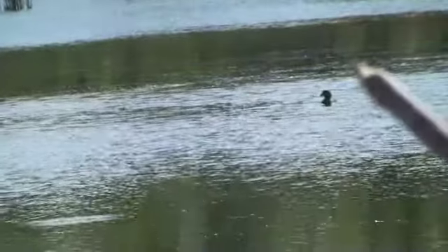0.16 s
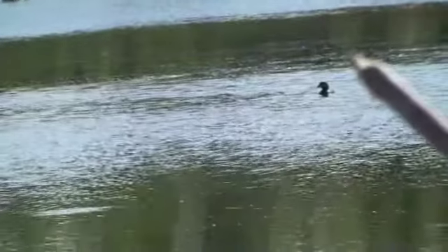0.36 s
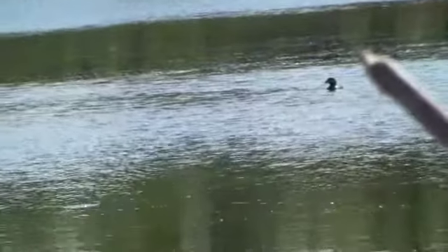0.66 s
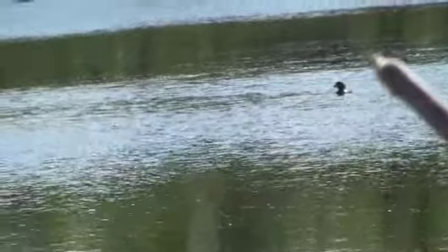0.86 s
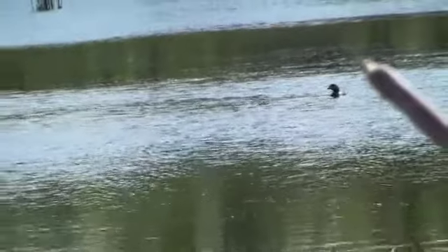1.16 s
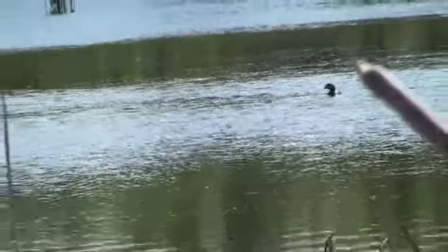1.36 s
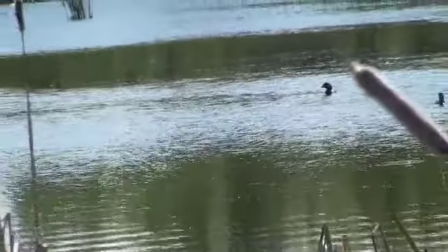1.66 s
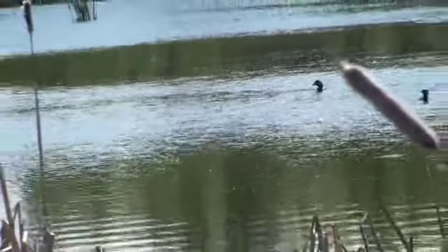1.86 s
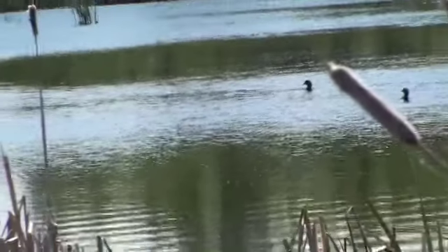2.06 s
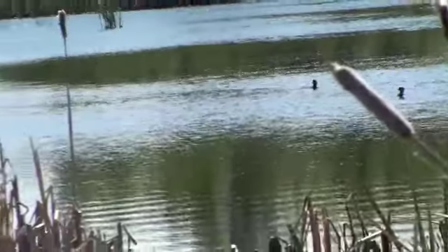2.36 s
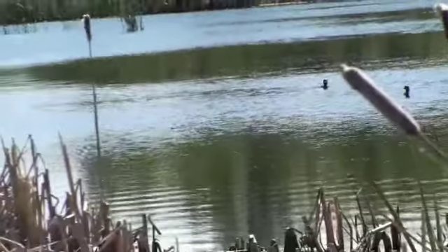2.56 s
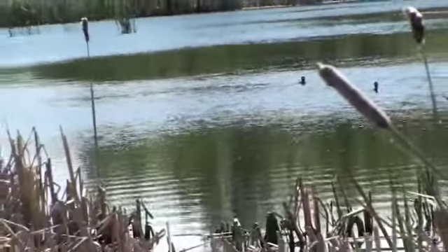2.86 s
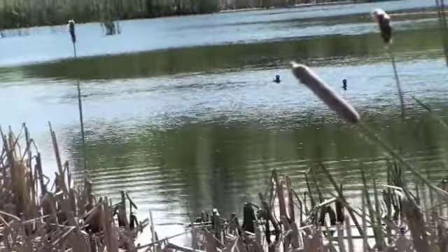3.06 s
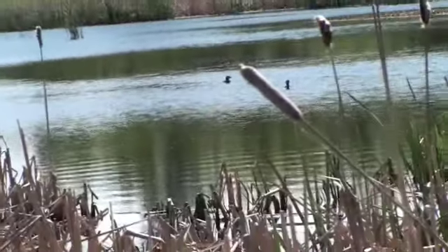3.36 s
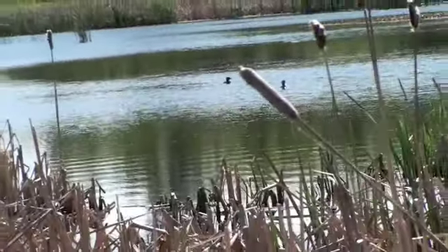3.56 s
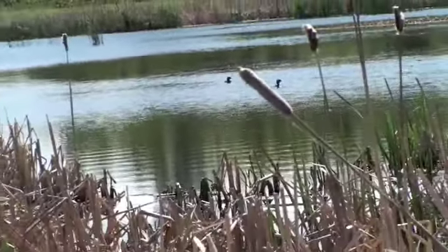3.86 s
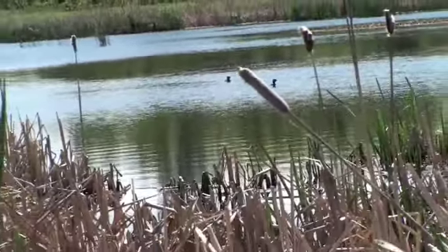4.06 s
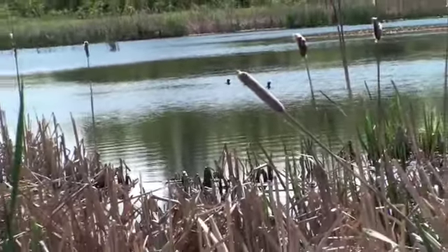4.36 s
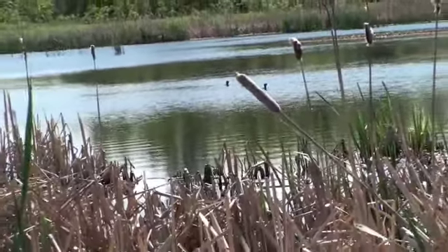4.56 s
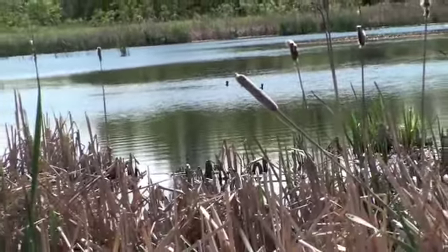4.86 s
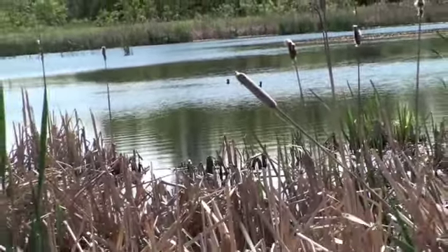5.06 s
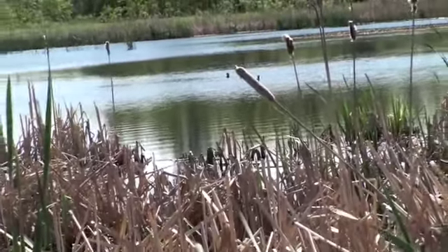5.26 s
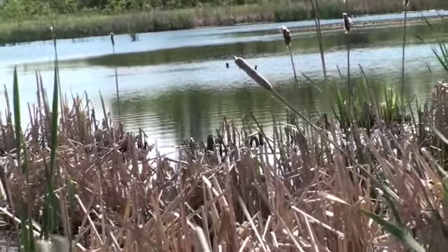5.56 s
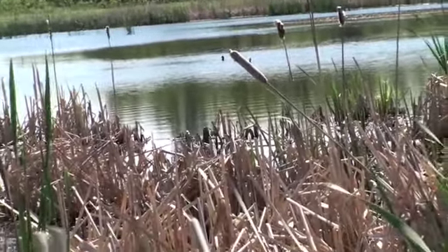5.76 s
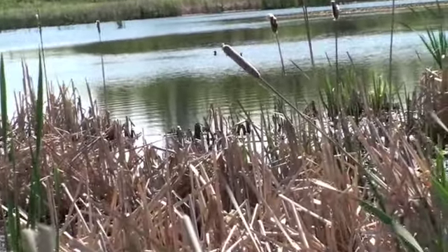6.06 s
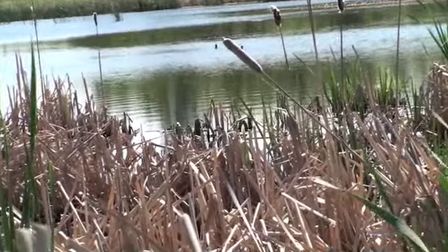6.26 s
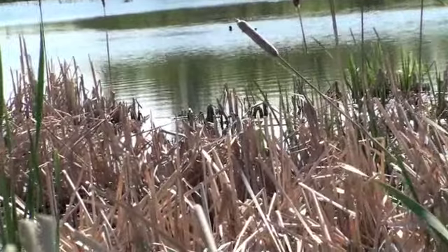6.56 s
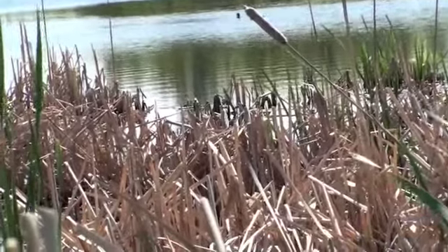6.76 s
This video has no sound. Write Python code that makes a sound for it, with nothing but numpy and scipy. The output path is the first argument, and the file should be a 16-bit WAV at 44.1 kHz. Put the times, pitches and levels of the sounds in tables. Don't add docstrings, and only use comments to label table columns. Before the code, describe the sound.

Small marsh birds chip, whistle, rattle and scold from both sides while gusty wind thumps a bare microphone and dry reeds hiss.

```python
import sys
import numpy as np
from scipy import signal
from scipy.io import wavfile
from scipy.ndimage import uniform_filter1d

SR = 44100
rng = np.random.default_rng(int(sys.argv[2]) if len(sys.argv) > 2 else 0)


def nominal_scale(level):
    x = np.asarray(level, float) / 20
    return 10 ** x


def master_out(mix):
    frames = np.transpose(np.atleast_2d(mix))
    ceiling = np.clip(frames, -1, 1)
    pcm = np.round(ceiling * 32767).astype(np.int16)
    wavfile.write(sys.argv[1], SR, pcm)


N = 304731
CLOCK = np.arange(N) / SR


def evened(x):
    return x / np.sqrt(np.mean(x ** 2) + 1e-20)


def add(mix, s, sound, pan_db):
    part = mix[:, round(s * SR):][:, :len(sound)]
    part += sound[:part.shape[1]] * nominal_scale(np.array([[pan_db / 2], [-pan_db / 2]]))


def whistle(hz, overtone_db, rough):
    white = rng.standard_normal((len(hz), 2))
    shake = evened(signal.oaconvolve(white, np.hanning(70)[:, None], "same")).T
    turns = 2 * np.pi * np.cumsum(hz * (1 + 0.034 * rough * shake[0])) / SR
    tone = np.sin(turns) + nominal_scale(overtone_db) * np.sin(2 * turns)
    return np.sqrt(2) * tone * (1 + rough * shake[1])


def bird(notes, pan_db, knee, bend, overtone_db, rough, swell_db=0., snap_db=-99, edge=0.29):
    out = np.zeros((2, N))
    for s, length, start_hz, turn_hz, end_hz, db in notes:
        u = np.linspace(0, 1, round(length * SR))
        rise = np.clip(1 - u / knee, 0, 1)
        fall = np.clip((u - knee) / (1 - knee), 0, 1)
        hz = turn_hz + (start_hz - turn_hz) * rise ** bend + (end_hz - turn_hz) * fall ** bend
        tone = whistle(hz, overtone_db - 2 * swell_db * rise, rough) * nominal_scale(db - swell_db * rise)
        add(out, s, tone * signal.windows.tukey(len(u), edge), pan_db)
        snap = whistle(np.linspace(1.2 * turn_hz, 2300, 340), 0.1, rough) * np.hanning(340)
        add(out, s + length - .005, nominal_scale(db + snap_db) * snap, pan_db)
    return out


def arched(notes, start, end):
    return [(s, length, start * hz, hz, end * hz, db) for s, length, hz, db in notes]


def slid(notes):
    return [(s, length, a, np.sqrt(a * b), b, db) for s, length, a, b, db in notes]


# [top t/s, rise t/s, start f/Hz, top f/Hz, level/dB]
CHIPS = [(1.32, 0.014, 4110, 4620, -42), (1.401, 0.018, 3720, 4520, -43), (1.484, 0.021, 3700, 4810, -42),
         (1.663, 0.0087, 4300, 4740, -38.5), (2.187, .022, 3950, 4660, -39), (2.96, 0.014, 3370, 4660, -37),
         (3.034, .016, 3770, 4510, -39), (3.119, 0.024, 3300, 4440, -42.5),
         (3.204, 0.022, 3250, 4340, -41.5), (3.289, 0.021, 3380, 4290, -48),
         (3.377, 0.02, 3430, 4700, -41.5), (3.472, .032, 3300, 4300, -42), (3.552, 0.026, 3500, 3920, -40),
         (3.65, .031, 3250, 4430, -43), (3.734, 0.028, 3305, 4410, -42.5), (3.826, 0.017, 3610, 4420, -39),
         (3.913, 0.021, 3540, 4650, -39.5), (4.012, 0.022, 3490, 4610, -36.5),
         (4.103, 0.013, 4540, 4880, -35.5), (4.2, 0.019, 3910, 4510, -38), (4.297, .016, 4260, 4710, -36),
         (4.402, 0.015, 4150, 4520, -39), (4.514, .012, 3850, 4510, -37), (4.64, 0.009, 3410, 4020, -40)]


def chips():
    out = np.zeros((2, N))
    drop_s, drop_hz, drop_db = .012, 2150, -13
    for top_s, rise_s, start_hz, top_hz, db in CHIPS:
        t = np.arange(-rise_s, drop_s, 1 / SR)
        done, fall = np.clip(1 + t / rise_s, 0, 1), np.clip(t / drop_s, 0, 1)
        climb = np.sin(np.pi / 2 * done ** (1 + 48 * rise_s))
        swell_db = (10 - 270 * rise_s) * (1 - done)
        hz = start_hz + (top_hz - start_hz) * climb + (drop_hz - top_hz) * fall ** 1.4
        octave_db = -27 + 35 * fall ** 1.8 + rng.uniform(-5, 6)
        level = nominal_scale(db - swell_db + drop_db * fall) * signal.windows.tukey(len(t), .22)
        add(out, top_s - rise_s, whistle(hz, octave_db, .26) * level, 5.3)
    return out


# [t/s, length t/s, turning f/Hz, level/dB]
SOFT_CHIPS = [(2.857, 0.019, 4270, -39.5), (4.907, 0.0306, 4440, -47), (5.138, 0.02673, 3920, -45.5),
              (5.252, 0.025, 3830, -48), (5.541, 0.01408, 3780, -51.5), (5.671, 0.033, 4150, -45.5),
              (5.842, 0.021, 4020, -48), (5.963, 0.014, 3570, -50), (6.213, 0.008, 4020, -48),
              (6.606, 0.012, 4522, -57), (6.68, 0.015, 4620, -51.5), (6.754, 0.027, 4700, -55),
              (6.84, 0.017, 4600, -53.7)]


def soft_chips():
    return bird(arched(SOFT_CHIPS, .93, 0.97), 4.5, knee=0.68, bend=1.14, overtone_db=-22, rough=0.17,
                swell_db=1.5, snap_db=-24)


# [t/s, length t/s, turning f/Hz, level/dB]
HOOKS = [
    (6.16, 0.029, 4580, -42.5),
    (6.243, 0.032, 4390, -38.5),
]


def hooks():
    return bird(arched(HOOKS, .9, 0.97), 4.2, knee=0.67, bend=2.15, overtone_db=-24, rough=0.22,
                swell_db=0.5, snap_db=-28)


# [t/s, length t/s, turning f/Hz, level/dB]
ARCHES_RIGHT = [
    (1.594, 0.025, 4270, -38),
    (1.683, 0.025, 4440, -34.5),
    (1.772, 0.024, 4290, -32.5),
    (1.881, 0.02749, 4500, -33.5),
    (1.976, 0.024, 4480, -33.5),
]


def rival():
    return bird(arched(ARCHES_RIGHT, .79, .81), -9, knee=.55, bend=3.2, overtone_db=-24, rough=.1)


# [t/s, length t/s, f/Hz, level/dB]
HELD = [(2.481, 0.04, 2790, -53), (3.488, 0.11, 2760, -50), (3.591, .11, 3210, -55),
        (3.806, 0.081, 2288, -55), (4.236, 0.067, 2750, -53.5), (4.376, 0.059, 2523, -47.5),
        (4.773, 0.057, 2155, -56), (5.288, 0.1, 2737, -48.5), (5.384, .13, 3124, -57.5),
        (5.682, 0.04, 2510, -54)]
# [t/s, length t/s, start f/Hz, end f/Hz, level/dB]
SLIDES = [(2.54, 0.062, 2200, 3020, -53.5), (2.615, 0.07, 2610, 2200, -55.5),
          (3.052, 0.031, 3080, 2940, -48.5), (3.08, .022, 2800, 2510, -49),
          (3.885, 0.041, 2500, 2550, -52.5), (4.328, 0.028, 2130, 2930, -50),
          (4.86, 0.0413, 3130, 2550, -50), (4.895, 0.025, 2528, 2540, -48.5),
          (4.937, 0.03908, 2310, 1960, -56)]


def clear_whistles():
    return bird(arched(HELD, 0.99, 0.99) + slid(SLIDES), -13.5, knee=.5, bend=0.8, overtone_db=-25,
                rough=0.14, edge=0.38)


def vibrato(t, lag_turns, lag_s):
    return 71 * t - lag_turns * (1 - np.exp(-t / lag_s))


def trill(s, t, hz, swing_hz, db, turns, pan_db, tops_db, down_db, rough):
    height = 2 / np.pi * np.arcsin(.95 * np.cos(2 * np.pi * turns))
    stress_db = tops_db * height + down_db * np.sin(2 * np.pi * turns)
    stress_db = stress_db * np.minimum(swing_hz / 300, 1)
    tone = whistle(hz + swing_hz * height, -24, rough) * nominal_scale(db + stress_db)
    out = np.zeros((2, N))
    add(out, s, tone * signal.windows.tukey(len(t), .08), pan_db)
    return out


# [t/s, length t/s, opening centre f/Hz, level/dB]
TRILLS = [
    (1.91, 0.093, 3820, -38.5),
    (2.189, 0.13, 3680, -38),
]


def near_trills():
    out = np.zeros((2, N))
    for s, length, hz, db in TRILLS:
        t = np.arange(0, length, 1 / SR)
        centre = hz * (1 - .4 * (1 - np.exp(-t / 0.075)))
        turns = .13 + vibrato(t, lag_turns=.44, lag_s=.02)
        out += trill(s, t, centre, 0.32 * centre, db - 67 * t, turns, 7.49, tops_db=6.4, down_db=4.5,
                     rough=0.1185)
    return out


# [t/s, level/dB, left-right level/dB, centre f/Hz]
SCOLDS = [(0.7448, -39.5, 11, 4320), (1.0863, -47, 4, 3710), (1.2344, -35, 8, 4140),
          (1.8402, -37, 10.5, 4120), (2.2538, -35.5, 10.5, 4040), (2.656, -39, 12.5, 4300),
          (2.9927, -30.5, -11, 4600), (3.954, -39.5, -8, 4340), (5.2748, -31.5, -9.5, 4260),
          (5.3987, -42, -1, 3040), (6.2176, -41, 2, 4100)]


def scolds():
    out, t = np.zeros((2, N)), np.arange(2200) / SR
    gap_s, rise_s, rasp_db = .0035, 0.0093, -14.5
    band = signal.butter(3, [3000, 8800], "band", fs=SR, output="sos")
    for s, db, pan_db, hz in SCOLDS:
        heap = nominal_scale(rasp_db) * evened(signal.sosfilt(band, rng.standard_normal(len(t))))
        for k, (late, top, step) in enumerate(rng.random((12, 3))):
            fall_hz = hz * np.geomspace(1 + .42 * top, .8, 400)
            fall = nominal_scale(-7.0 * step) * whistle(fall_hz, -28, .8) * np.hanning(400)
            at = round((k + late) * gap_s * SR)
            room = heap[at:at + 400]
            room += fall[:len(room)]
        u = t / rise_s
        add(out, s - .009, nominal_scale(db - 5.0) * heap * u * np.exp(1 - u), pan_db)
    return out


# [t/s, centre f/Hz, swing f/Hz, level/dB]
FAR_TRILL = [
    (6.34, 3945, 30, -34),
    (6.364, 4364, 150, -37.5),
    (6.44, 4053, 180, -42.5),
    (6.505, 3620, 200, -43),
    (6.563, 3730, 250.6, -42.5),
    (6.625, 3510, 250, -42.5),
]
UNDER_DB = [-12, -15.5, -4, -7, -8, -4]


def far_trill():
    s, *columns = np.transpose(FAR_TRILL)
    t = np.arange(s[0], s[-1], 1 / SR)
    hz, swing_hz, db = (np.interp(t, s, c) for c in columns)
    turns = vibrato(t - 6.34, lag_turns=2.05, lag_s=.1) + .15
    rough = np.interp(t, s[[1, 3]], [.18, .32])
    upper = trill(s[0], t, hz, swing_hz, db, turns, 1.94, tops_db=3.4, down_db=6, rough=rough)
    under_db = db + np.interp(t, s, UNDER_DB)
    under = trill(s[0], t, .76 * hz, 420, under_db, turns, 2.1, tops_db=0.3, down_db=1.4, rough=0.97)
    return upper + under


# [t/s, turning f/Hz, level/dB]
PIPS = [
    (.515, 3550, -60),
    (.664, 3550, -52),
    (.814, 3530, -49),
    (0.966, 3500, -49),
]


def pips():
    notes = []
    for s, hz, db in PIPS:
        for k in range(3):
            notes.append((s + k * .025, .015 - k * .002, hz, db - 3 * k))
    return bird(arched(notes, 1.14, 0.91), 3, knee=0.5, bend=0.96, overtone_db=-30, rough=0.073)


# [t/s, length t/s, start f/Hz, end f/Hz, level/dB]
STRAYS = [(1.218, 0.015, 6800, 6400, -52.5), (1.556, 0.055, 2780, 2837, -51),
          (4.747, 0.015, 2590, 2340, -46), (4.909, .015, 3180, 3000, -47),
          (5.034, 0.023, 3170, 3244, -49.5), (6.064, 0.034, 5100, 4780, -53),
          (6.25, 0.068, 1690, 1743, -51.5), (6.488, .032, 2096, 2120, -50), (6.834, 0.043, 2155, 2136, -48),
          (1.735, 0.028, 3950, 3100, -52), (1.905, 0.016, 4000, 3210, -36.5),
          (.56, .03, 1450, 1620, -56), (1.548, 0.044, 4830, 4660, -47), (2.979, 0.014, 2100, 2110, -54),
           (3.012, .035, 2150, 2220, -55), (3.245, 0.02, 5750, 5780, -56),
           (4.353, 0.038, 2880, 2900, -48.5), (4.69, 0.012, 3750, 3850, -49),
           (4.92, 0.026, 2850, 2500, -51), (5.141, 0.023, 3150, 2900, -52), (5.608, 0.082, 2260, 2290, -57),
           (5.722, 0.025, 2200, 2100, -57), (5.67, .035, 880, 1026, -55), (6.02, .025, 5600, 6100, -63),
           (6.029, .02, 2000, 2380, -53), (6.07, .055, 1000, 994, -52.5), (6.093, .012, 4800, 4150, -54),
           (6.121, .035, 2950, 3190, -52), (6.211, .03, 1560, 1540, -58), (2.12, .06, 2000, 2300, -62)]


def strays():
    return bird(slid(STRAYS), 3, knee=0.516, bend=0.9, overtone_db=-16, rough=0.27, edge=0.56)


# [t/s, length t/s, turning f/Hz, level/dB]
COOS = [(.599, 0.034, 1214, -55), (1.026, 0.034, 1349, -57), (3.428, 0.032, 1470, -51),
        (3.509, 0.03972, 1355, -54), (3.669, 0.038, 1580, -53), (5.175, 0.036, 1486, -56),
        (5.352, 0.052, 1144, -53.5), (5.418, 0.043, 1124, -52.5), (5.457, 0.045, 1550, -57),
        (5.741, 0.057, 1146, -48.5), (5.822, .052, 1530, -56)]


def coos():
    return bird(arched(COOS, 0.98, 0.99), -6.0, knee=0.67, bend=1, overtone_db=-32.5, rough=0.065)


# [t/s, level/dB]
REFRAINS = [
    (4.719, -46.5),
    (4.929, -47.5),
    (5.136, -47.5),
]
# [t/s, length t/s, start f/Hz, end f/Hz, level/dB]
REFRAIN = [
    (.009, .016, 7330, 5440, -0.56),
    (.024, .028, 5510, 4010, -0.18),
    (0.062, .022, 4800, 6300, -0.52),
    (.083, 0.023, 6230, 6040, -3.1),
]


def refrains():
    heads = [(s, 0.037, 7500, db - 3) for s, db in REFRAINS]
    held = bird(arched(heads, 1.002, 0.995), -7, knee=0.58, bend=1, overtone_db=-43, rough=0.09)
    notes = []
    for s, db in REFRAINS:
        for after, length, start_hz, end_hz, step_db in REFRAIN:
            notes.append((s + after, length, start_hz, end_hz, db + step_db))
    return held, bird(slid(notes), -10, knee=0.46, bend=0.91, overtone_db=-46, rough=0.39)


# [t/s, length t/s, start f/Hz, end f/Hz, level/dB]
SEEPS = [(4.133, 0.058, 7150, 4460, -51), (4.282, 0.022, 5350, 6070, -47), (4.34, 0.078, 8400, 4370, -48.5),
         (4.493, 0.03, 5600, 5630, -51.5), (4.519, .028, 6120, 6100, -51), (4.555, 0.089, 8570, 4870, -50),
         (4.74, 0.0077, 3150, 5738, -41), (4.813, 0.028, 5700, 3660, -48), (5.023, 0.031, 5800, 3650, -48)]


def seeps():
    return bird(slid(SEEPS), -10, knee=0.46, bend=0.91, overtone_db=-46, rough=0.39)


# [t/s, length t/s, start f/Hz, end f/Hz, level/dB]
FAINT = [
    (3.6, .06, 3200, 1400, -49),
    (1.7, 0.025, 4910, 5200, -50),
    (2.005, .058, 2700, 2300, -53),
    (2.09, 0.066, 2400, 2290, -54),
    (3.1, 0.0702, 2680, 2050, -53.5),
]


def faint_calls():
    return bird(slid(FAINT), .5, knee=0.505, bend=0.97, overtone_db=-36, rough=0.29)


def marsh(x, t60, wet_db, steady, size):
    slots = np.arange(150, SR // 2, 22)
    at = slots + rng.integers(0, 22, (2, len(slots)))
    taps = np.zeros((2, SR // 2 + 22))
    np.put_along_axis(taps, at, rng.choice([-1., 1.], at.shape) * nominal_scale(-60 * at / SR / t60), 1)
    taps += 0.56 * taps[::-1]
    sway = steady + 0.79 * evened(signal.oaconvolve(rng.standard_normal(N), np.hanning(size), "same"))
    spread = (1.01 * x + 0.34 * x[::-1]) * sway
    return x + nominal_scale(wet_db) * signal.fftconvolve(spread, taps / np.linalg.norm(taps[0]), axes=1)[:, :N]


def read(points, hz):
    f, value = np.transpose(points)
    return np.interp(np.log(hz + 1), np.log(f + 1), value)


# [f/Hz, likeness 0-1]
SAME = [(25, .95), (60, .6), (130, .12), (300, .25), (600, .55), (1000, .55), (4000, .66), (9000, .62)]


def noise(field_db, patchy_db, flicker_db, size=1024, wide=8, count=N):
    hz = np.fft.rfftfreq(size, 1 / SR)[:, None]
    t = np.arange(4 * count // size + 5) * size / 4 / SR
    a, b, c, d, *patches = rng.standard_normal((len(t), len(hz), 6)).T
    patches = evened(uniform_filter1d(uniform_filter1d(np.array(patches), wide, 1), 6, 2))
    flicker = evened(uniform_filter1d(rng.standard_normal((len(t), 2)).T, 3, 1))[:, None]
    same, left = np.clip(read(SAME, hz), -1, 1), a + 1j * b
    right = same * left + np.sqrt(1 - same ** 2) * (c + 1j * d)
    z = np.array([left, right])
    z *= nominal_scale(field_db(hz, t) + patchy_db * patches + flicker_db * flicker)
    return evened(signal.istft(z, nperseg=size, noverlap=3 * size // 4)[1][:, :count])


# [t/s, level/dB]
WIND = [(.55, -33.5), (.76, -37), (.81, -48), (.9, -37.5), (1.11, -46), (1.17, -34), (1.28, -41.5),
        (1.33, -33), (1.77, -49), (3.25, -40), (3.7, -47), (3.79, -40), (3.95, -41), (4.41, -46.5),
        (5.58, -45), (5.681, -38.5), (5.8, -46.5), (6.8, -43.5)]
# [f/Hz, level/dB per Hz]
WIND_TONE = [(12, -41), (20, -8.5), (43, 0.5), (81, -0.5), (173, -9), (260, -21.5), (600, -35.5),
             (1000, -61.5)]
# [t/s, peak level/dB, left-right level/dB, f/Hz]
BUFFETS = [(0.566, -39, 1.0, 45.8), (0.621, -27, -3, 134), (1.148, -21.5, 5, 50.86), (1.307, -21, -11, 72),
           (3.41, -30, 15, 57), (3.776, -22, 10, 51), (3.916, -21.5, 10, 52.7), (4.736, -29, 1, 81),
           (5.644, -18, -5.5, 73.4), (6.705, -18.5, -1.0, 43.13)]


def wind():
    s, level_db = np.transpose(WIND)

    def field_db(hz, t):
        gust_db = np.interp(t, s, level_db) + 42.5
        return read(WIND_TONE, hz) + 0.29 * gust_db * np.clip(np.log2(hz / 130 + 0.009), 0, 2.2)

    out = noise(field_db, 1.57, 1.55, size=2048, wide=2) * nominal_scale(np.interp(CLOCK, s, level_db) + 9.0)
    for s, db, pan_db, hz in BUFFETS:
        u = np.arange(3000) / SR * hz
        add(out, s, nominal_scale(db + 13.5) * np.sin(2 * np.pi * u) * u * np.exp(-2.2 * u), pan_db)
    return out


# [t/s, peak level/dB]
FLAPS = [
    (0.546, -37),
    (0.658, -40),
    (1.184, -39),
    (1.303, -33),
    (3.202, -43),
    (3.783, -50),
    (4.357, -40),
]


def flaps():
    out, t = np.zeros((2, N)), np.arange(1500) / SR
    band = signal.butter(2, [150, 650], "band", fs=SR, output="sos")
    for (s, db), pan_db in zip(FLAPS, rng.uniform(-25, 6, len(FLAPS))):
        puff = evened(signal.sosfilt(band, rng.standard_normal(len(t))))
        add(out, s, nominal_scale(db - 2.0) * puff * t / 0.0066 * np.exp(1 - t / 0.0044), pan_db)
    return out


# [f/Hz, level/dB per Hz]
REEDS = [(120, -51), (200, -6.5), (355, -8), (966, -6.5), (1810, -12.5), (3830, -12.5), (5100, -16),
         (9890, -29)]
# [t/s, level/dB]
REEDS_DB = [(.5, -42), (3.5, -41), (6.91, -41)]


def reeds():
    hiss = noise(lambda hz, t: read(REEDS, hz) + 0 * t, 1.62, 0.83)
    return hiss * nominal_scale(np.interp(CLOCK, *np.transpose(REEDS_DB)))


# [f/Hz, level/dB per Hz]
EARLIER = [(12, -36.5), (20, -6), (97, -1), (178, -9), (357, -27.5), (2480, -36), (9900, -55.5),
           (15000, -58)]
# [t/s, level/dB]
FADE_OUT = [(0, -2), (.1, -5.5), (.2, -14), (.27, -26.5), (.289, -45)]


def earlier_view():
    t = CLOCK[:SR // 3]
    air = nominal_scale(-43) * noise(lambda hz, t: read(EARLIER, hz) + 0 * t, 2.5, 0.66, count=len(t))
    throb = np.exp(2.0 * (np.cos(2 * np.pi * 51 * (t - .003)) - 1))
    frog = nominal_scale(-65) * throb * whistle(2600 + 0 * t, -10.0, 0.37)
    out = (air + frog) * nominal_scale(np.interp(t, *np.transpose(FADE_OUT), right=-200))
    return np.pad(out, ((0, 0), (0, N - len(t))))


# [t/s, level/dB]
FADE_IN = [(.487, -47), (.5, -24), (.52, -16.5), (.55, -8.5), (.6, -6)]


def scene():
    singer, answer, clear = chips(), rival(), clear_whistles()
    rattles = nominal_scale(-1.5) * near_trills()
    scattered = pips() + strays()
    refrain_heads, refrain_figures = refrains()
    near = 0.91 * singer + soft_chips() + hooks()
    near += .55 * answer + 0.65 * clear
    near += 0.63 * rattles + scolds() + nominal_scale(-2.0) * far_trill()
    near += 0.76 * scattered + coos() + refrain_heads
    far = seeps() + refrain_figures + faint_calls()
    birds = marsh(near, 0.27, -5.5, 0.59, size=110) + nominal_scale(-4.5) * marsh(far, 0.25, 4.9, 0.36, size=80)
    birds += 0.09 * singer + 0.49 * clear + 0.33 * scattered + 0.34 * (answer + .45 * rattles)
    fade_in = nominal_scale(np.interp(CLOCK, *np.transpose(FADE_IN), left=-200))
    return birds + earlier_view() + (wind() + flaps() + reeds()) * fade_in


def low_pass(x):
    return signal.sosfilt(signal.butter(12, 15700, fs=SR, output="sos"), x)


def record(dry):
    mid, side = dry.mean(0), (dry[0] - dry[1]) / 2
    side = signal.oaconvolve(side, signal.firwin(255, 11300, fs=SR), "same")
    hz, t, z = signal.stft(mid, SR, nperseg=1024, noverlap=512)
    band = np.clip((hz - 14550) // 385 + 1, 0, 4).astype(int)
    frames = len(t) // 2 + 1
    luck = .6 * rng.random((frames, 1)) + .4 * rng.random((frames, 5))
    kept = luck < [9, .5, .36, .33, 0]
    gain = kept * nominal_scale(np.array([0, -2, -6, -9, 0]))
    gain = gain.repeat(2, 0)[:len(t), band].T
    mid = signal.istft(z * gain, SR, nperseg=1024, noverlap=512)[1][:N]
    return low_pass(np.array([mid + side, mid - side]))


dry = scene()
out = record(dry)
master_out(out)
```